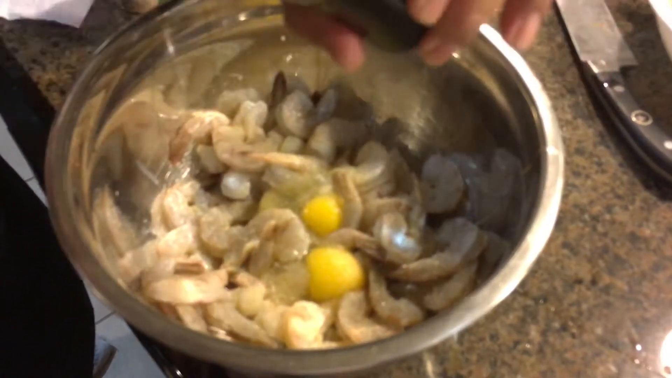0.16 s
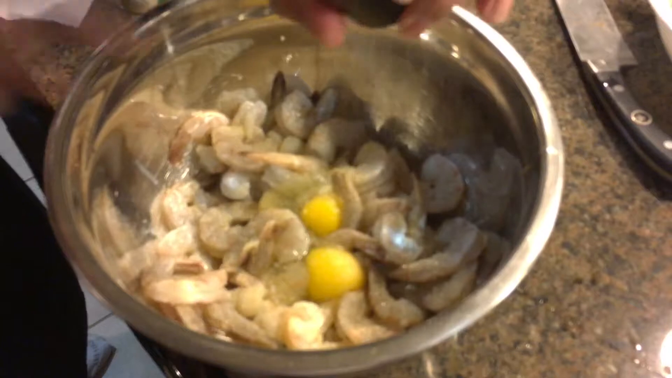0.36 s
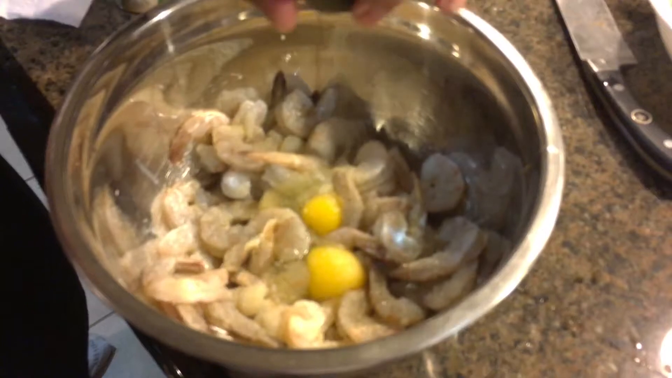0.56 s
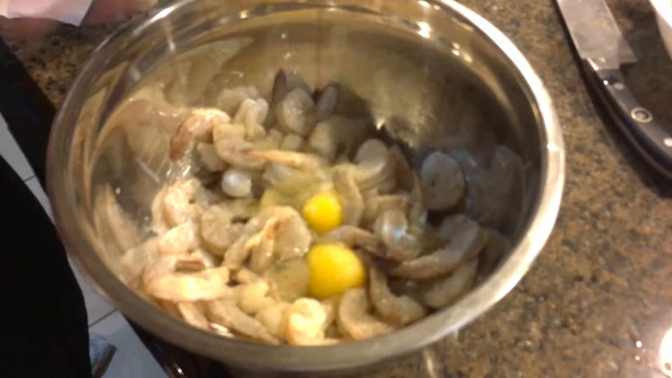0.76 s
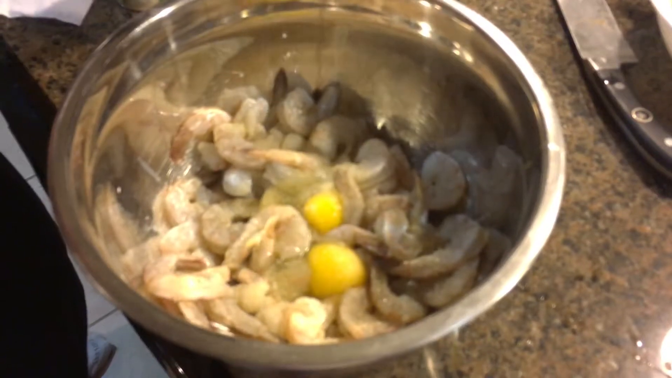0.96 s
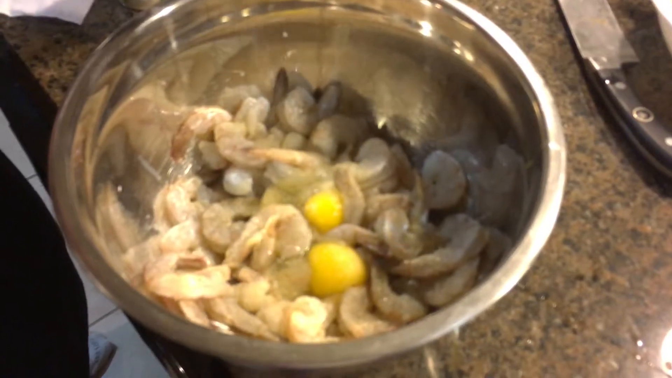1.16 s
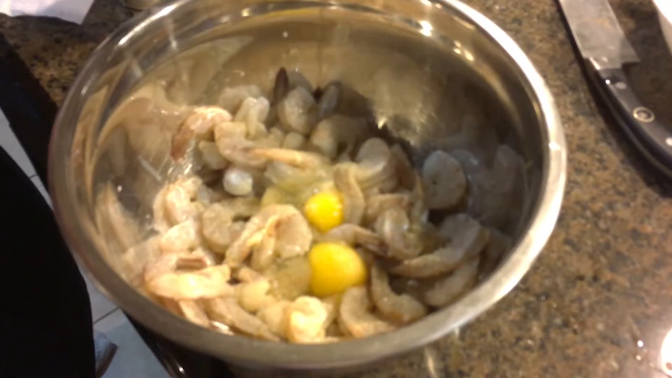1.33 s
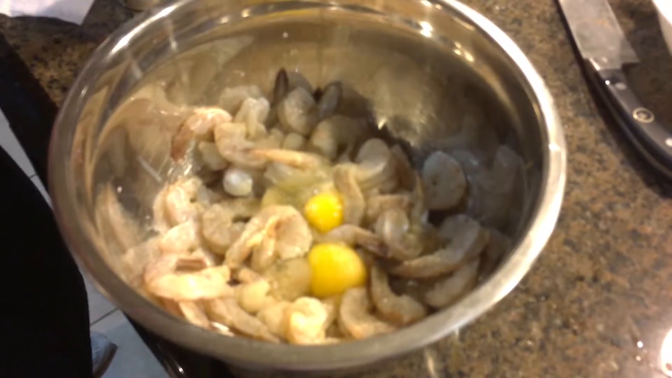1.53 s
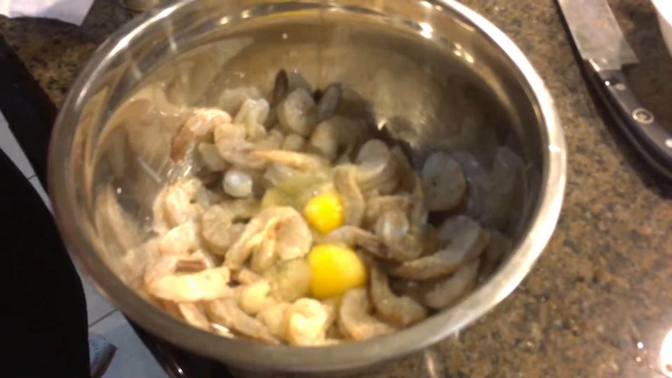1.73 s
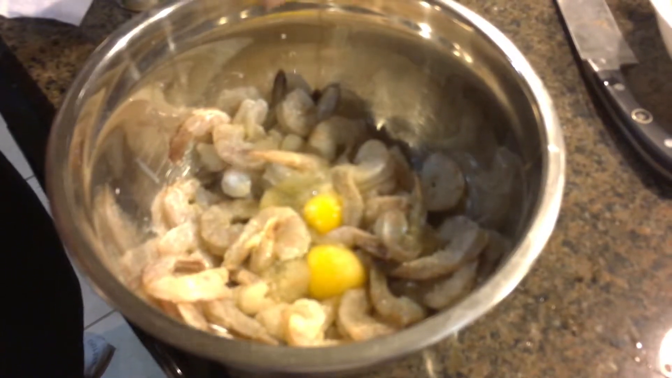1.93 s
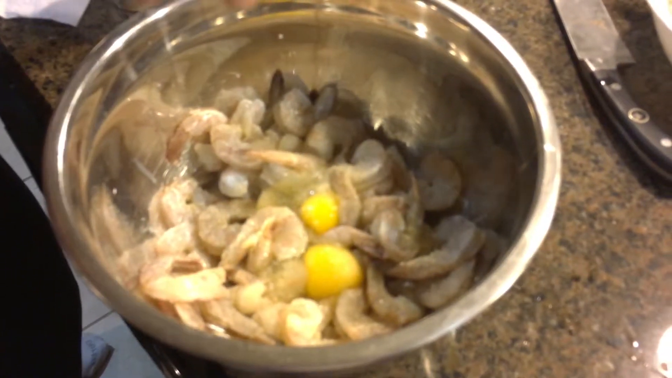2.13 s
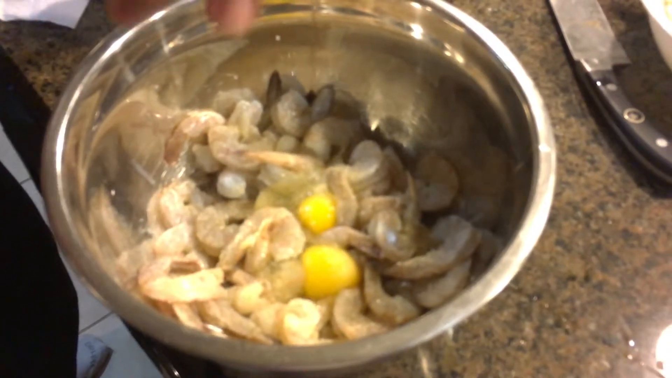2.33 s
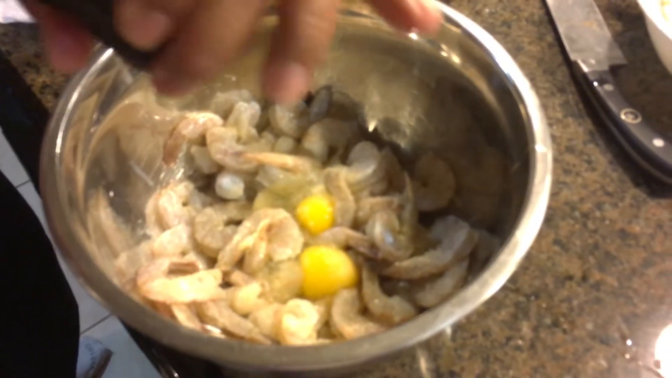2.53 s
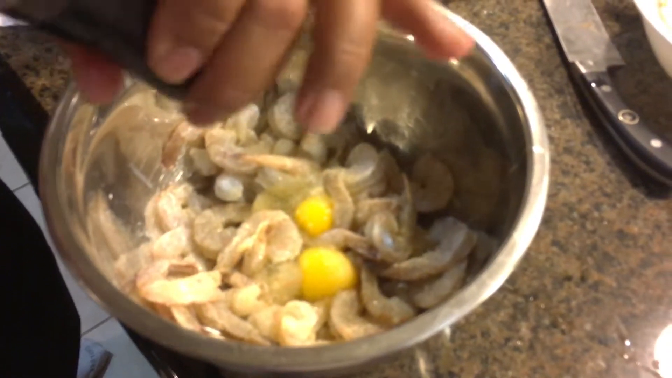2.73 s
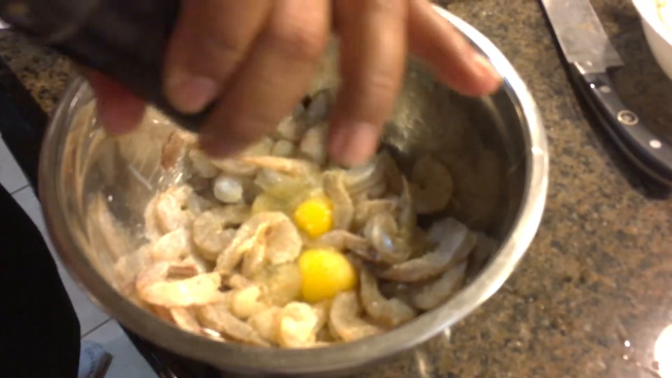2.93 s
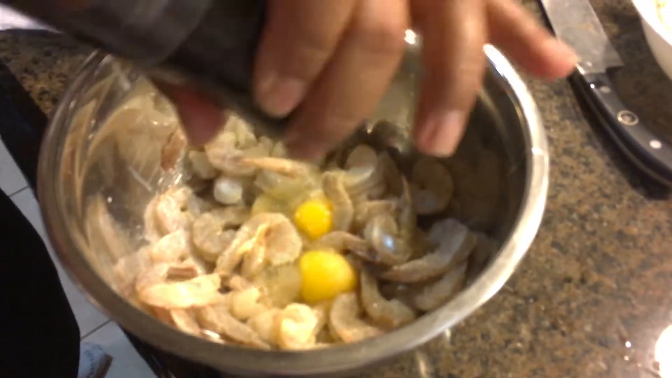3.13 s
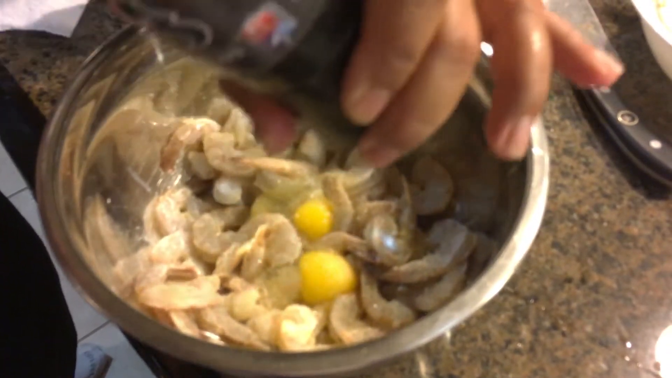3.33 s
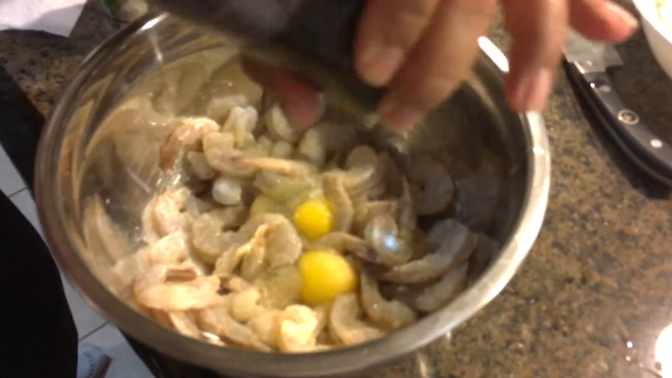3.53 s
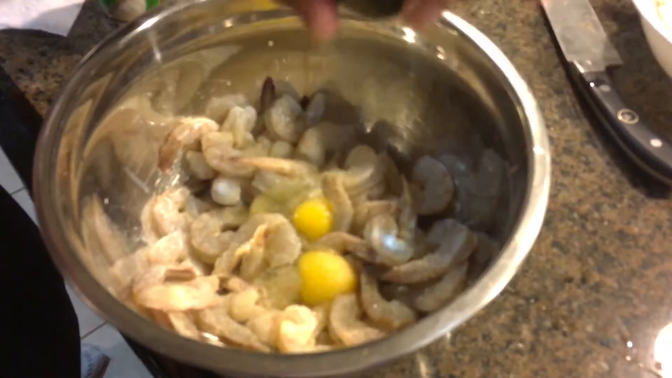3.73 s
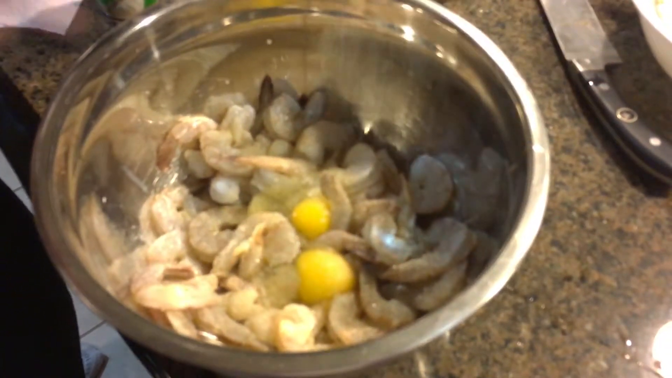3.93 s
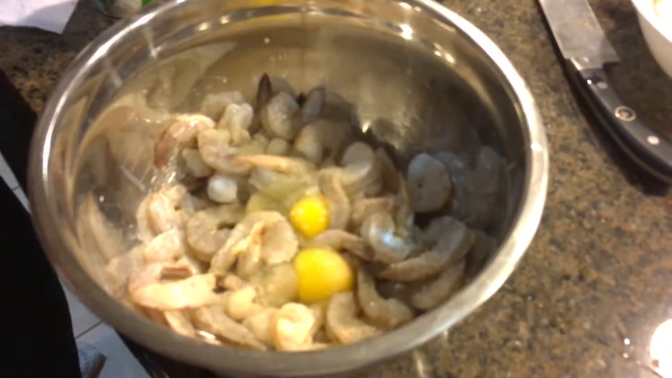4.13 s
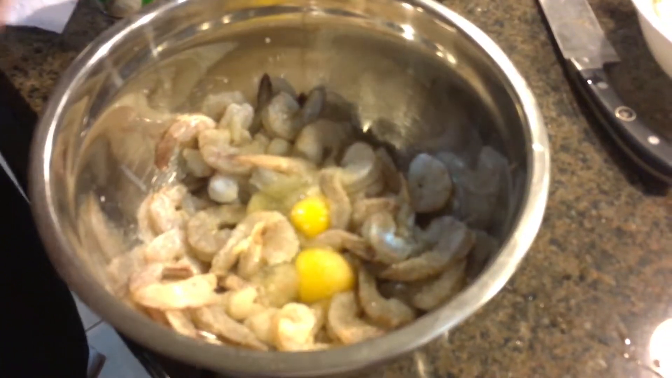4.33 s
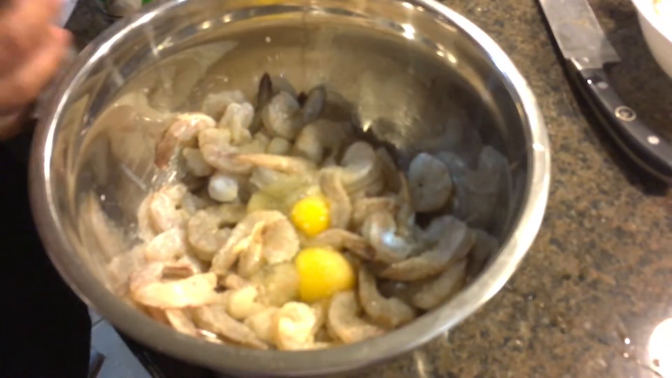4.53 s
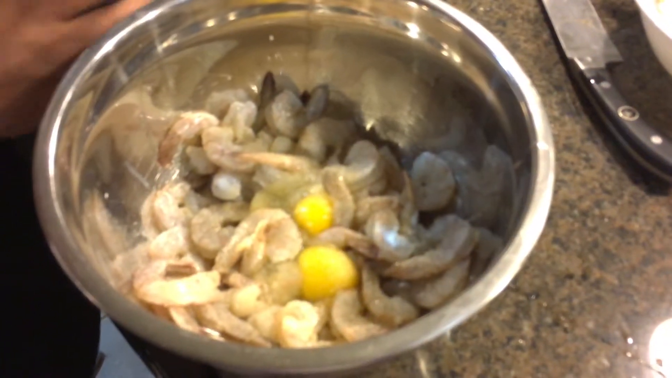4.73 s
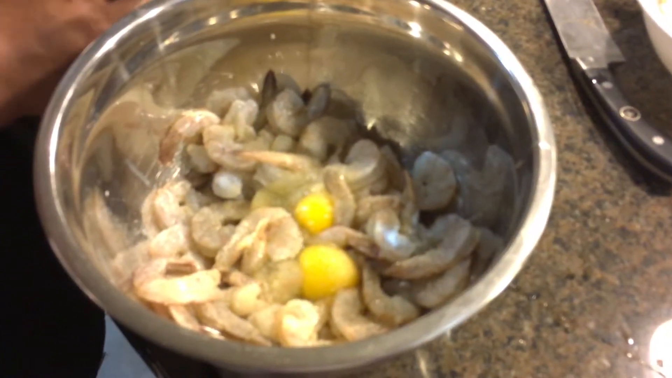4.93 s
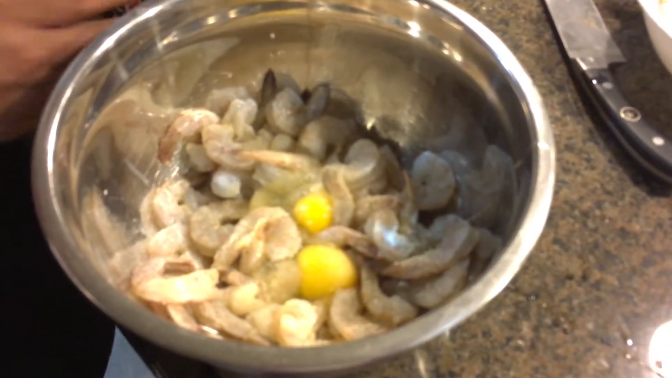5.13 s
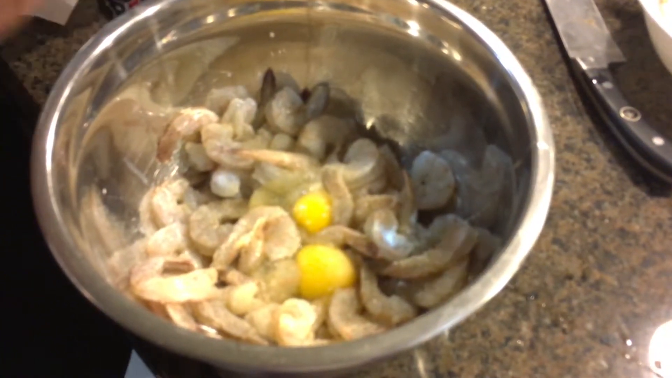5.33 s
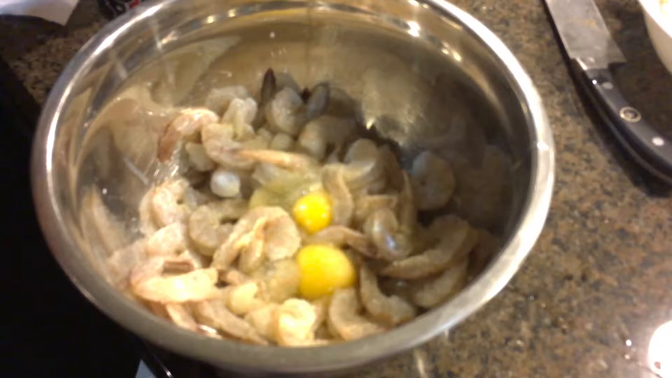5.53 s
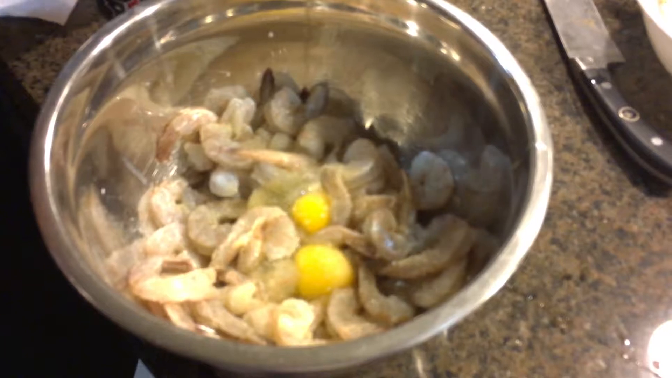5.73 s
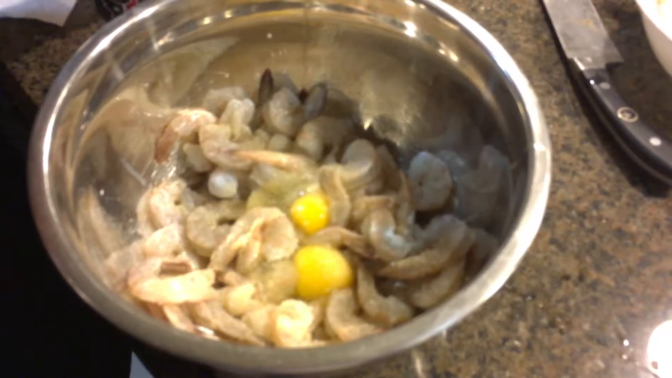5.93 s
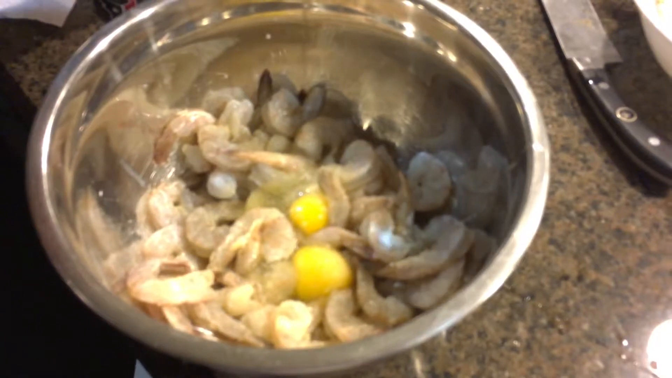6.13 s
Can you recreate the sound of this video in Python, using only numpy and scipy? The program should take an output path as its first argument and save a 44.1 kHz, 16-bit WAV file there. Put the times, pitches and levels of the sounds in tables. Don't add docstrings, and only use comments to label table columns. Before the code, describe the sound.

A small kitchen heard through a close phone microphone, with slight room reverberation, soft low air noise, a steady mains hum near 120 Hz and a faint whine that comes and goes. At 0 s a salt mill twist is just ending. Eleven more follow from 0.25 to 3.9 s, roughly every 0.35 s, each a tenth-of-a-second burst of bright, gritty crunching with woody midrange body, sharp crystal cracks and a thin jar ring near 1.5 kHz. Strength varies irregularly. Soft thumps of the grip, single grain ticks and tiny finger squeaks fill the gaps. After a light handling rustle, at about 4.45 s the mill is tipped: salt swishes for a quarter second with a low squeak. From 4.75 to 4.93 s it lands on stone, a rapid hollow clatter of knocks and clicks. Grains settle and rustle until about 5.2 s, leaving quiet hum to 6.2 s.

```python
import sys
import numpy as np
from scipy import signal
from scipy.fft import rfft, irfft, next_fast_len
from scipy.io import wavfile
from scipy.ndimage import uniform_filter1d, map_coordinates

SR = 44100
rng = np.random.default_rng(int(sys.argv[2]) if len(sys.argv) > 2 else 0)


def gain_from_db(level_db):
    decades = np.asarray(level_db, float) / 20
    return 10 ** decades


def pcm_store(signal):
    levels = np.round(np.clip(np.atleast_2d(signal), -1, 1) * 32767)
    wavfile.write(sys.argv[1], SR, levels.astype(np.int16).T)


N = 272538

# free jar ring in dB, palm weight in dB, cap over crunch in dB,
# lowest body mode in dB, split at the stall in dB.
GRIP = [(-4, -13.5, -3, 1, 0), (-2, -17.5, -3, -1, -20), (1, -18.5, -5, -1, 4), (4, -18, -5, 1, 10),
        (2, -18, -4, 2, -3), (-4, -19.5, -5.5, -3, -1), (-8, -13.5, -5, 3, 9), (-1.5, -18, -5, -1, 8),
        (-17, -15, -8, 2, 9), (-5, -16.5, -5, 0, 9), (-3, -22, -8, -5.5, 3), (-16, -18, -5, 1, 15.5)]
# time in seconds, level in dB.
POUR = [
    (4.44, -54),
    (4.452, -40.5),
    (4.512, -29),
    (4.56, -36.5),
    (4.6, -41),
    (4.648, -39),
    (4.74, -51.5),
    (4.77, -75),
]
POUR_BODY_DB, POUR_CAP_DB = -25, -24.5
SLACK_DB, SLACK_DB_PER_S = -12.5, 796
BODY_SLACK_DB, BODY_SLACK_DB_PER_S = -14, 2495
LET_GO_DB_PER_S, BODY_LET_GO_DB_PER_S = 387, 600
SNAP_DB = 1.5
# frequency in Hz, density in dB per Hz.
CRUNCH_SPECTRUM = [(2350, -20), (4000, -9), (4910, -8.5), (5260, -2), (6180, 0.5), (6930, -4.5),
                   (7420, -5.5), (8710, 1), (10300, 1.5), (11800, 3.5), (14300, 1.5), (15700, 2)]
# frequency in Hz, width in Hz, level in dB.
BODY_MODES = [(1070, 330, -5.5), (1530, 179, 3), (1923, 264, -6.5)]
# frequency in Hz, width in Hz, level in dB.
CAP_MODES = [(2428, 340, 3), (2930, 150, 2.5), (3310, 1140, -3.5), (4140, 3600, -29.5)]
# frequency in Hz, width in Hz, level in dB.
PALM_MODES = [(400, 630, -4.5), (845, 316, 3.5)]
# frequency in Hz, width in Hz, level in dB.
JAR_MODES = [(1500, 8, -15), (1560, 1.4, 7), (2490, 5.2, -23)]


def burrs():
    fine = unit(grit(share=0.0091, spread_db=3.0, life=0.0006, bed=0.79))
    coarse = unit(grit(share=0.005, spread_db=2.5, life=0.0018, bed=0.35))
    stream = unit(grit(share=0.046, spread_db=6.5, life=0.001, bed=3.0))
    pour = gain([(0, -120)] + POUR + [(4.8, -120)])
    start, length, _, _, body_over_db = twists()
    free_db, weight_db, cap_db, deep_db, _ = np.transpose(GRIP)
    s, body_db, crunch_db = np.transpose(splits())

    crunch = fine * stroke(0, LET_GO_DB_PER_S, SLACK_DB, SLACK_DB_PER_S)
    crunch = crunch + stream * pour + bursts(s, crunch_db - 1.5, life=0.0018)

    body_settings = BODY_LET_GO_DB_PER_S, BODY_SLACK_DB, BODY_SLACK_DB_PER_S
    low = coarse * (stroke(body_over_db - 2.5, *body_settings) + gain_from_db(POUR_BODY_DB) * pour)
    high = coarse * (stroke(cap_db, *body_settings) + gain_from_db(POUR_CAP_DB) * pour)
    blows = snaps(s, body_db + SNAP_DB)
    low = low + bursts(s, body_db - 4.5, life=0.00043) + blows
    high = high + bursts(s, body_db - 10, life=0.0014) + gain_from_db(-2) * blows

    middles = start + length / 2
    free, weight, deep = (gain(np.c_[middles, db]) for db in (free_db, weight_db, deep_db))
    body = radiated(low, lambda f: -modes(BODY_MODES[1:])(f))
    body = body + gain_from_db(-7.5) * radiated(low * deep, modes(BODY_MODES[:1]))
    body = body + radiated(high, modes(CAP_MODES))
    body = body + radiated((low + high) * weight, modes(PALM_MODES))
    ring = gain_from_db(9.5) * filtered(low * free, modes(JAR_MODES))
    bright = patchy(radiated(crunch, colour(CRUNCH_SPECTRUM)), depth_db=2.0)
    return bright + patchy(body, depth_db=1.3) + ring


# start in seconds, stall in seconds, crunch in dB at full effort,
# place of full effort from 0 to 1, body over crunch in dB.
TWISTS = [(-.115, 0, -21, 0.49, -1.5), (0.248, 0.351, -23, 0.75, -2.5), (0.598, 0.705, -23.5, 0.61, -2.5),
          (0.96, 1.082, -23.5, 0.45, -3), (1.325, 1.42, -22, 0.51, -3), (1.693, 1.807, -21, 0.18, -1),
          (2.047, 2.152, -24.5, 0.41, -2), (2.391, 2.509, -24.5, 0.57, -0.5),
          (2.765, 2.873, -22.5, 0.15, -3), (3.094, 3.217, -22.5, 0.52, -2), (3.458, 3.532, -19, 0.05, -1),
          (3.776, 3.884, -22.5, 0.38, -4)]


def twists():
    start, stall, *rest = np.transpose(TWISTS)
    return np.array([start, stall - start, *rest])


EFFORT_DB_PER_S2 = 1507


def effort_db(t):
    start, length, db, place = twists()[:4, :, None]
    from_peak = np.clip(t - start, 0, length) - place * length
    return db - EFFORT_DB_PER_S2 * from_peak ** 2


BITE_S = 0.003
STALL_DROP_DB, STALL_DROP_S = -6, 0.0033


def stroke(over_db, let_go_db_per_s, slack_db, slack_db_per_s):
    t = np.arange(0, N + 32, 32) / SR
    start, length = twists()[:2, :, None]
    early = np.maximum(start - t, 0)
    late = np.maximum(t - start - length, 0)
    bite_db = slack_db * np.clip((start - t) / BITE_S + 1, 0, 1) - slack_db_per_s * early
    release_db = STALL_DROP_DB * np.minimum(late / STALL_DROP_S, 1) - let_go_db_per_s * late
    db = effort_db(t) + np.reshape(over_db, (-1, 1)) + bite_db + release_db
    return np.interp(np.arange(N) / SR, t, gain_from_db(db).sum(axis=0))


# time in seconds, body in dB, crunch in dB.
CRACKS = [(.2645, -33, -33), (.303, -9, -12), (.3231, -13, -8.5), (.3357, -14.5, -25), (.6344, -17, -28),
          (.6506, -15, -24), (.6837, -11.5, -11), (.9933, -11.5, -19.5), (1.3693, -29, -13.5),
          (1.4087, -11, -16.5), (1.6983, -9, -17), (1.7488, -11.5, -23), (2.7625, -13, -20),
          (1.789, -40, -22), (2.066, -31, -9), (2.0782, -16, -36), (2.1398, -17, -18.5),
          (2.4408, -6.5, -21), (2.4529, -5.5, -17), (2.7815, -20, -26), (2.821, -39, -15),
          (2.8425, -22, -32), (2.8529, -17, -21), (3.1334, -19, -20), (3.1847, -13.5, -19),
          (3.48, -6.5, -20), (3.518, -21, -10.5), (3.7861, -7, -15.5), (3.8401, -17.5, -14),
          (3.851, -22, -19)]
CATCH_DB = 1
LESSER_DB, LESSER_SPREAD_DB = -1, 5


def splits():
    start, length = twists()[:2, 1:]
    count = len(start)
    chance = rng.random((count, 4, 3))
    lesser = (start[:, None] + length[:, None] * chance[..., 0]).ravel()
    s = np.r_[start + BITE_S, start + length, lesser]
    own = np.r_[np.arange(count), np.arange(count), np.repeat(np.arange(count), 4)]
    db = effort_db(s)[1:][own, np.arange(len(s))]
    edge = np.r_[np.full(count, CATCH_DB), np.transpose(GRIP)[4, 1:]]
    size = LESSER_DB + LESSER_SPREAD_DB * (2 * chance[..., 1:].reshape(-1, 2) - 1)
    body_db = db + np.r_[edge - 3, size[:, 0] - 3]
    crunch_db = db + np.r_[edge, size[:, 1]]
    return np.r_[CRACKS, np.c_[s, body_db, crunch_db]]


# time in seconds, level in dB.
SLIDING = [(0, -52), (2.2, -57), (2.62, -62), (2.75, -47), (3.05, -67), (3.45, -56), (3.77, -54),
           (3.93, -61), (4.124, -50.5), (4.222, -66), (4.362, -38), (4.445, -60), (5.0, -49.5),
           (5.186, -59), (5.248, -67), (5.598, -65), (5.708, -62.5), (6.18, -66)]
# time in seconds, level in dB.
TICKS = [(.0046, -29), (.222, -29.5), (.3956, -31), (.4776, -34), (.4896, -33), (.7613, -30.5),
         (1.1406, -34), (1.1683, -31), (1.189, -33), (1.1993, -35), (1.226, -37), (1.6563, -28),
         (1.9333, -42), (1.9464, -42), (2.232, -32), (2.2882, -31), (2.384, -30), (2.5983, -34),
         (3.4267, -34), (3.609, -33), (3.6278, -33.5), (3.7452, -31), (.9558, -26), (1.323, -23),
         (1.686, -24), (2.0375, -27), (3.4534, -23), (3.6477, -47), (3.696, -44), (.4348, -40)]
# time in seconds, level in dB.
SETTLING = [(4.0266, -36), (4.109, -35), (4.4172, -29.5), (4.427, -34), (4.45, -30), (4.943, -42),
            (4.7511, -39), (4.777, -38), (4.7845, -39), (4.8611, -33), (4.9641, -31.5), (4.97, -36),
            (4.9906, -31), (4.9984, -34.5), (5.0138, -30), (5.0718, -38), (5.085, -37), (5.1459, -34.5),
            (5.183, -44)]
# frequency in Hz, density in dB per Hz.
SLIDE_SPECTRUM = [(1760, -60), (3000, -7), (3640, -3), (4840, -6), (6930, -2), (7750, -4.5), (9210, 1.5),
                  (10500, 1), (15700, 2)]
SHED_DB, SHED_DB_PER_S = -27, 105


def loose_salt():
    start, length, peak_db = twists()[:3]
    since = np.arange(N) / SR - (start + length)[:, None]
    shed_db = peak_db[:, None] + SHED_DB - SHED_DB_PER_S * np.abs(since)
    shed = ((since > 0) * gain_from_db(shed_db)).sum(axis=0)
    grains = unit(grit(share=0.0057, spread_db=2.5, life=0.003, bed=0.67))
    rustle = grains * (gain(SLIDING) + shed) * gain_from_db(0.5)

    def small_grain(f):
        return colour(SLIDE_SPECTRUM)(f) / (1 + (3800 / (f + 1)) ** 4)

    s, db = np.transpose(np.r_[TICKS, SETTLING])
    drops = radiated(bursts(s, db + 1, life=0.00065) + snaps(s, db + 6), small_grain)
    return patchy(radiated(rustle, colour(SLIDE_SPECTRUM)) + drops, depth_db=3.0)


# start in seconds, length in seconds, frequency in Hz, width in Hz, level in dB.
RUBS = [
    (1.941, .02, 6970, 500, -52),
    (0.522, .033, 6750, 500, -55),
    (0.85, 0.026, 6400, 500, -56),
    (1.182, 0.016, 7000, 600, -51),
    (4.455, 0.075, 2350, 120, -46.5),
    (4.616, 0.13, 1836, 414, -49.5),
]
# start in seconds, length in seconds, frequency in Hz,
# width in Hz, level in dB.
HELD = [
    (0.226, 0.0041, 2850, 1700, -38),
    (3.4255, 0.0029, 4200, 273, -34.5),
    (3.746, 0.0045, 4730, 590, -42),
    (3.98, 0.09, 6770, 500, -54.5),
    (4.449, 0.031, 1555, 45, -42),
    (4.476, 0.056, 1560, 33, -41),
    (4.494, 0.07, 4290, 200, -51.5),
]
STRETCH_PER_S = 2.5


def fingers():
    out = np.zeros(N)
    rubs = [row + (STRETCH_PER_S,) for row in RUBS] + [row + (0,) for row in HELD]
    for s, length, hz, width_hz, db, stretch in rubs:
        u = np.arange(int(0.15 * SR)) / SR / length
        noise = rng.standard_normal((2, len(u)))
        flutter = unit(signal.lfilter([1], [1, -np.exp(-np.pi * width_hz / SR)], noise))
        phase = 2 * np.pi * np.cumsum(hz * (1 + stretch * length * np.minimum(u, 1))) / SR
        shape = np.minimum(8 * u, 1) * np.exp(-u ** 3 * 2)
        add(out, s, gain_from_db(db) * shape * (flutter[0] * np.cos(phase) + flutter[1] * np.sin(phase)))
    return out


# time in seconds, peak in dB,
# pitch in Hz.
JOLTS = [(0.598, -28, 108), (0.952, -25, 113), (1.32, -24, 140), (1.684, -30, 91), (2.036, -22, 122),
         (2.392, -25.5, 75), (2.732, -26.5, 89), (3.09, -24, 77.5), (3.43, -23.5, 180), (3.449, -27, 79.5),
         (3.748, -26, 92), (4.1, -29.5, 99), (4.806, -30, 64.6)]


def jolts():
    low = np.zeros(N)
    for s, db, hz in JOLTS:
        add(low, s, swing(db, hz, cycles=0.26))
    return low


# time in seconds, jar ring in dB, thud in dB, thud pitch in Hz, click in dB.
BOUNCES = [(4.752, -37, -36.5, 400, -36), (4.801, -18.5, -33, 193, -25), (4.804, -19.5, -51, 152, -52),
           (4.812, -44, -30, 210, -50), (4.82, -17.5, -39, 317, -26), (4.832, -24.5, -32.5, 300, -42),
           (4.849, -42, -31, 181, -51), (4.857, -18, -58, 307, -42), (4.86, -34, -26, 460, -28),
           (4.868, -36, -31, 400, -50), (4.911, -24.5, -37.5, 298, -41), (4.915, -43, -28, 443, -48),
           (4.928, -53, -45, 170, -55)]
# frequency in Hz, width in Hz, level in dB.
STRUCK_MODES = [(1430, 12, 0), (1540, 177, 2), (2650, 140, -13), (3330, 500, -13)]


def bounces():
    thuds = np.zeros(N)
    for s, _, db, hz, _ in BOUNCES:
        add(thuds, s, swing(db, hz, cycles=0.54))
    s, ring_db, _, _, click_db = np.transpose(BOUNCES)
    blows = bursts(s, ring_db + 7.5, life=0.00067) + bursts(s, ring_db + 3.5, life=0.0061)
    blows = blows + snaps(s, ring_db + 28.5)
    click = bursts(s, click_db + 0.5, life=0.00079) + bursts(s, click_db - 13, life=0.0098)
    return thuds + filtered(blows, modes(STRUCK_MODES)) + filtered(click, lambda f: f / (f + 2500))


# frequency in Hz, t60 in seconds.
KITCHEN_T60 = [(300, 0.46), (2000, 0.4), (6000, 0.29), (14000, 0.16)]


def kitchen(x):
    hz, t, z = signal.stft(rng.standard_normal(SR // 2), SR, nperseg=256)
    decay = gain_from_db(-60 * t / along(KITCHEN_T60, hz)[:, None])
    tail = signal.istft(z * decay, SR, nperseg=256)[1]
    return signal.fftconvolve(np.pad(x, (200, 0)), tail / np.linalg.norm(tail))[:N]


# frequency in Hz, density in dB per Hz.
AIR_SPECTRUM = [(15, -40), (30, -16), (55, -6), (86, -7), (125, -11), (170, -5.5), (290, -13), (435, -21),
                (620, -17.5), (800, -21.5), (2100, -22.5), (3200, -35.5), (5500, -39), (15700, -48.5)]
# frequency in Hz, width in Hz, level in dB.
HUM_BANDS = [(182, 20, -67.5), (207.5, 3.1, -65.5), (228.6, 9.4, -69.5)]
# frequency in Hz, level in dB.
MAINS = (119.5, -54.5)
# time in seconds, level in dB.
WHINE = [
    (0, -60),
    (.62, -64.5),
    (.72, -78),
    (1.25, -71),
    (1.33, -60),
    (2.15, -70),
    (2.6, -74),
    (2.9, -82),
    (6.18, -70),
]


def background():
    t = np.arange(N) / SR
    air = gain_from_db(-49.5) * unit(filtered(rng.standard_normal(N), colour(AIR_SPECTRUM)))

    def hum_response(f):
        return sum(gain_from_db(db) * modes([(hz, width, 0)])(f) * np.sqrt(SR / np.pi / width)
                   for hz, width, db in HUM_BANDS)

    hum = filtered(rng.standard_normal(N), hum_response)
    mains_hz, mains_db = MAINS
    mains_gain = gain_from_db(mains_db + 2.5 + 0.5 * slow(size=40))
    mains = mains_gain * np.sin(2 * np.pi * mains_hz * t + 1.5 * slow(size=30))
    whine_gain = gain(WHINE) * gain_from_db(6.5)
    whine = whine_gain * np.sin(2 * np.pi * 351 * t + 0.74 * slow(size=40))
    return air + hum + mains + whine


def grit(share, spread_db, life, bed):
    sizes = gain_from_db(spread_db * np.minimum(rng.exponential(size=N), 4))
    starts = (rng.random(N) < share) * sizes
    power = signal.lfilter([1], [1, -np.exp(-1 / (life * SR))], starts ** 2)
    return rng.standard_normal(N) * np.sqrt(bed + power / power.mean())


def bursts(times, levels_db, life):
    at = np.round(np.multiply(times, SR)).astype(int)
    kicks = np.bincount(at, gain_from_db(levels_db) ** 2, N)[:N]
    power = signal.lfilter([1], [1, -np.exp(-1 / (life * SR))], kicks)
    return rng.standard_normal(N) * np.sqrt(power)


def snaps(times, levels_db):
    signs = np.sign(rng.normal(size=len(times)))
    return np.bincount(np.round(times * SR).astype(int), gain_from_db(levels_db) * signs, N)[:N]


def swing(db, hz, cycles):
    u = np.arange(SR // 10) / SR * hz
    return -gain_from_db(db) * np.sin(2 * np.pi * u) * u * np.exp(-u / cycles) * 6


def patchy(x, depth_db):
    z = signal.stft(x, nperseg=128)[2]
    field = uniform_filter1d(rng.standard_normal(z.shape), size=4, axis=0)
    field = uniform_filter1d(field, size=4, axis=1)
    field = gain_from_db(depth_db * unit(field))
    return signal.istft(z * unit(field), nperseg=128)[1][:N]


def modes(table):
    def response(f):
        return sum((-1) ** k * gain_from_db(db) * 1j * f * width / (hz * hz - f * f + 1j * f * width)
                   for k, (hz, width, db) in enumerate(table))
    return response


def colour(spectrum):
    return lambda f: gain_from_db(along(spectrum, f))


def filtered(x, response):
    m = next_fast_len(N + SR)
    return irfft(rfft(x, m) * response(np.fft.rfftfreq(m, 1 / SR)), m)[:N]


def radiated(force, response):
    mean_power = np.mean(np.abs(response(np.linspace(1, SR / 2, num=4096))) ** 2)
    return filtered(force, response) / np.sqrt(mean_power)


def unit(x):
    return x / np.sqrt(np.mean(x ** 2) + 1e-20)


def along(points, hz):
    f, v = np.transpose(points)
    return np.interp(np.log(hz + 1), np.log(f + 1), v)


def gain(rows):
    return gain_from_db(np.interp(np.arange(N) / SR, *np.transpose(rows)))


def slow(size):
    return map_coordinates(rng.standard_normal(size + 4), [np.linspace(0, size, N)])


def add(x, s, piece):
    part = x[round(s * SR):][:len(piece)]
    part += piece[:len(part)]


def scene():
    near = burrs() + loose_salt() + fingers() + jolts() + bounces()
    return (near + gain_from_db(-18.5) * kitchen(near) + background())[None]


def roll_off(x):
    return signal.sosfilt(signal.butter(12, 16990, fs=SR, output="sos"), x)


# frequency in Hz, width in Hz, depth from 0 to 1.
NOTCHES = [(5010, 280, 0.3), (10470, 880, 0.38)]
BASS_CUT_HZ, TOP_HZ = 45, 15750


def record(dry):
    def phone(f):
        u = 1j * f / BASS_CUT_HZ
        bass_cut = u ** 2 / (1 + 1.4 * u + u ** 2)
        dips = [1 - depth / (1 + ((f - hz) / width * 2) ** 2) for hz, width, depth in NOTCHES]
        return bass_cut * (f < TOP_HZ) * np.prod(dips, axis=0)

    return roll_off(filtered(dry[0], phone)[None])


dry = scene()
out = record(dry)
pcm_store(out)
```